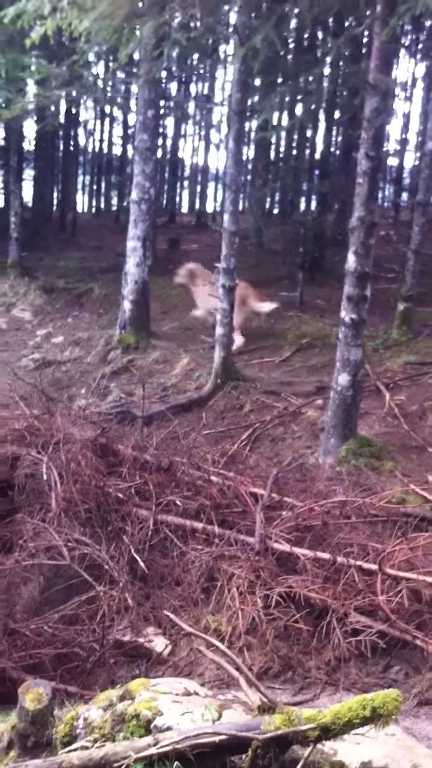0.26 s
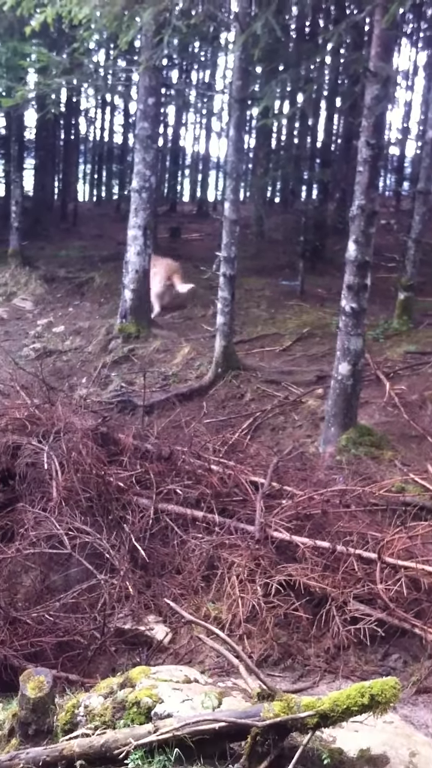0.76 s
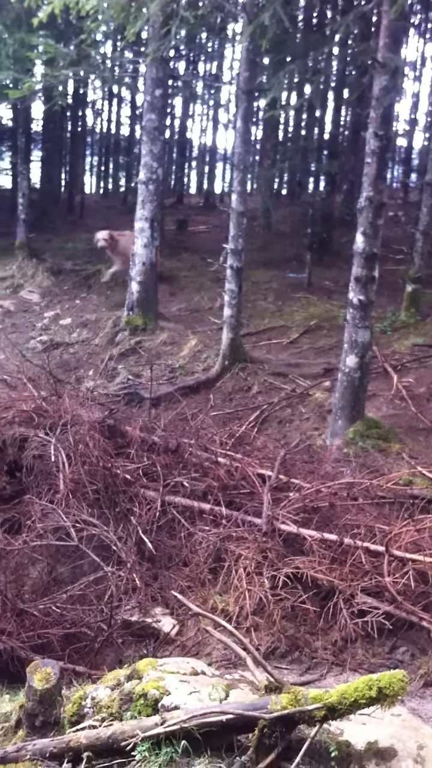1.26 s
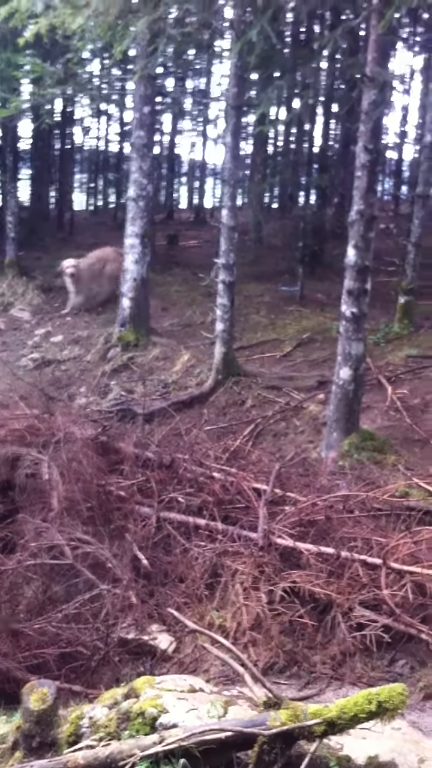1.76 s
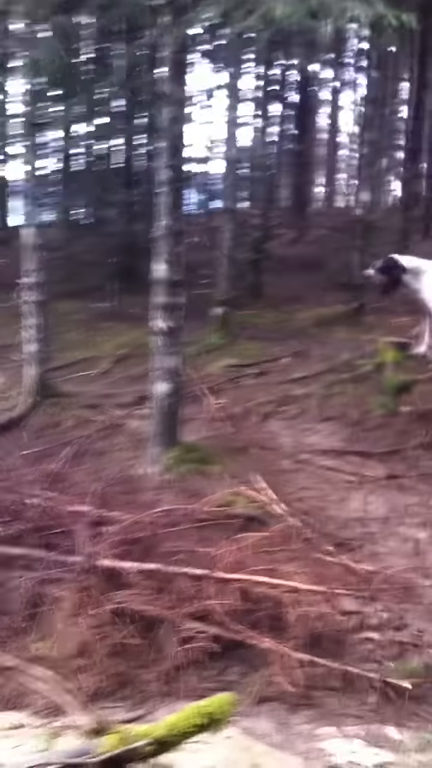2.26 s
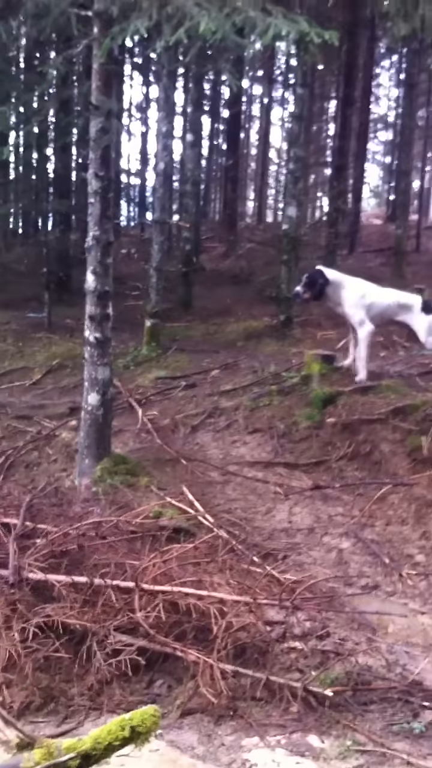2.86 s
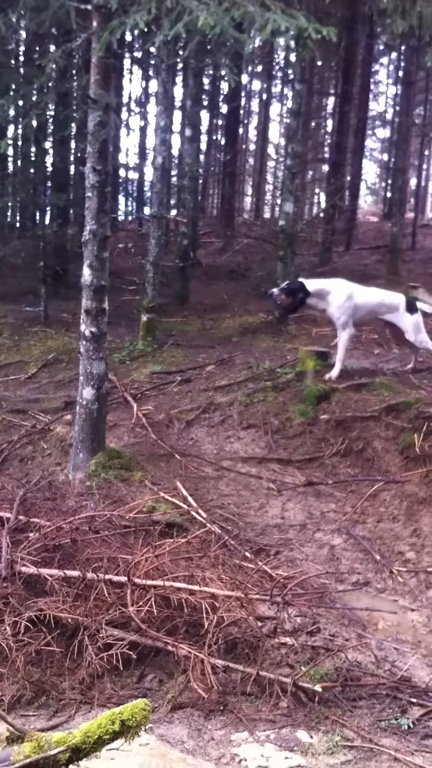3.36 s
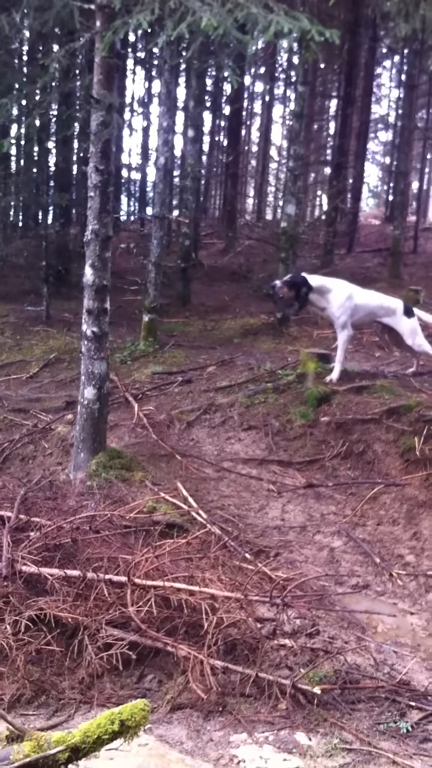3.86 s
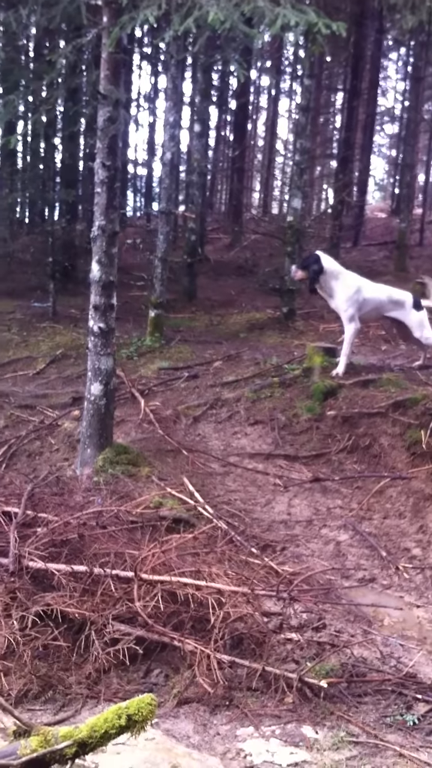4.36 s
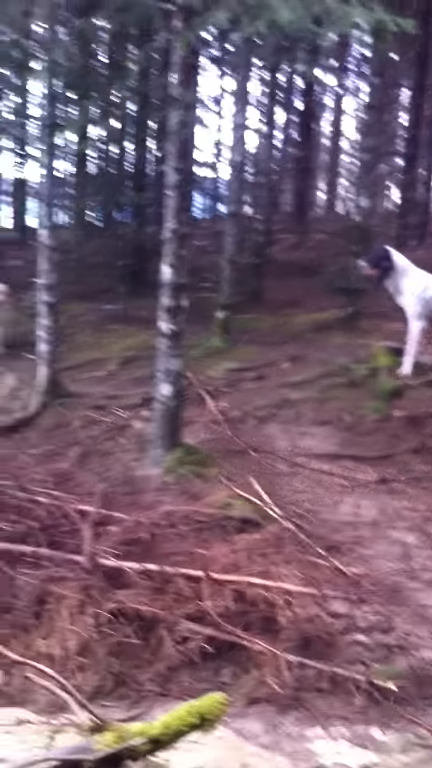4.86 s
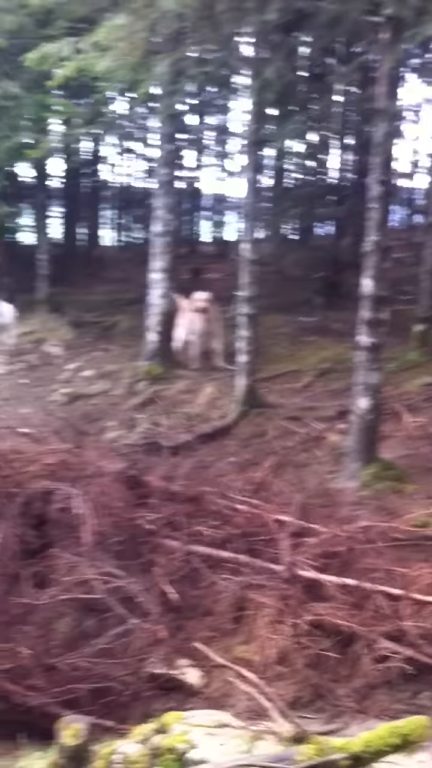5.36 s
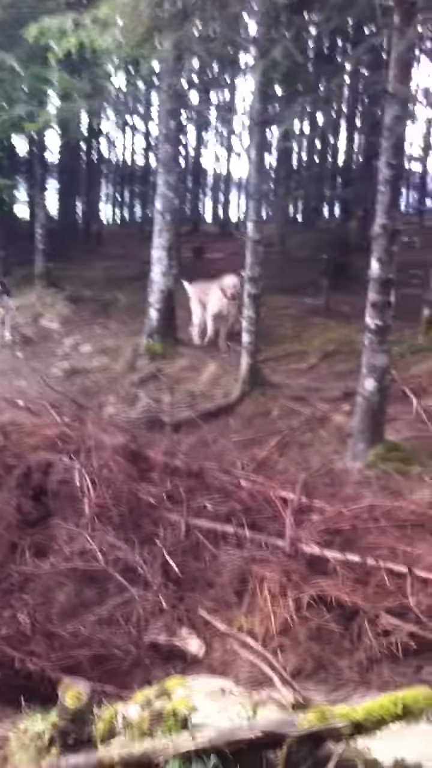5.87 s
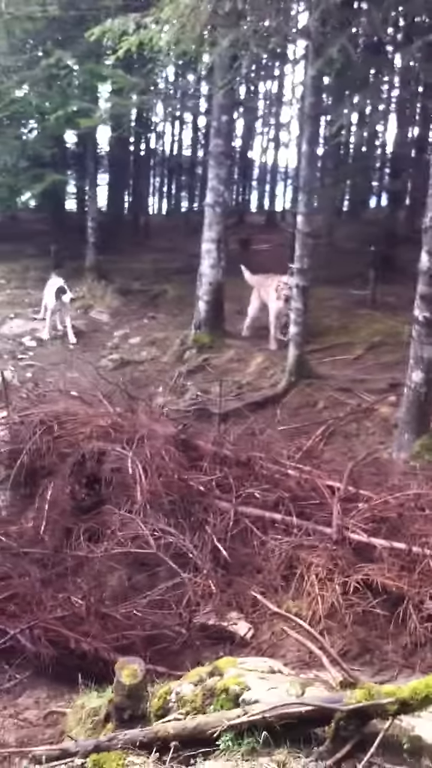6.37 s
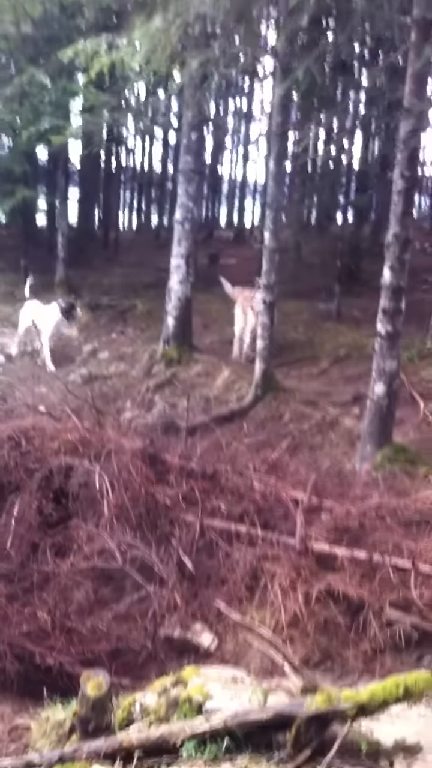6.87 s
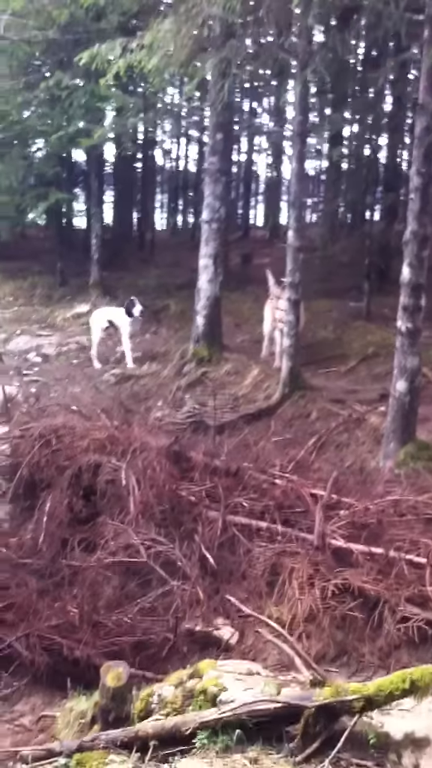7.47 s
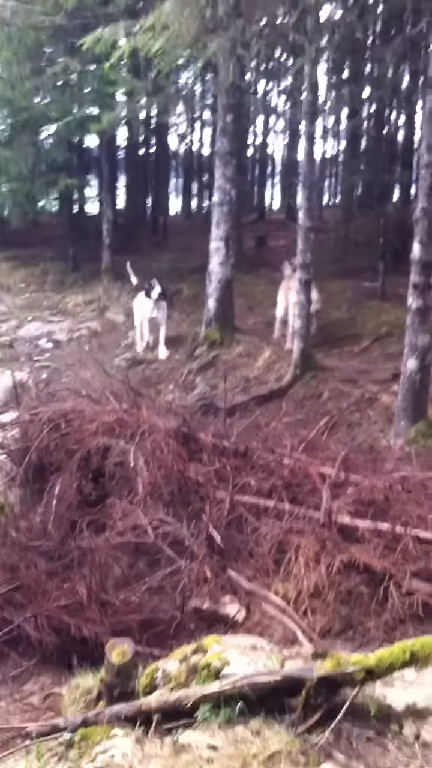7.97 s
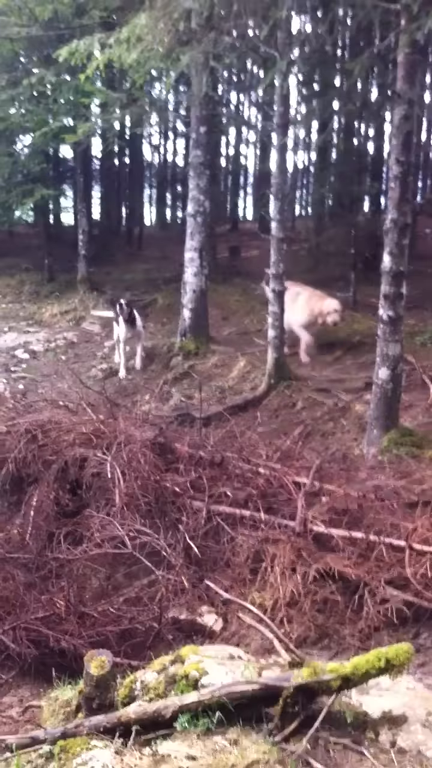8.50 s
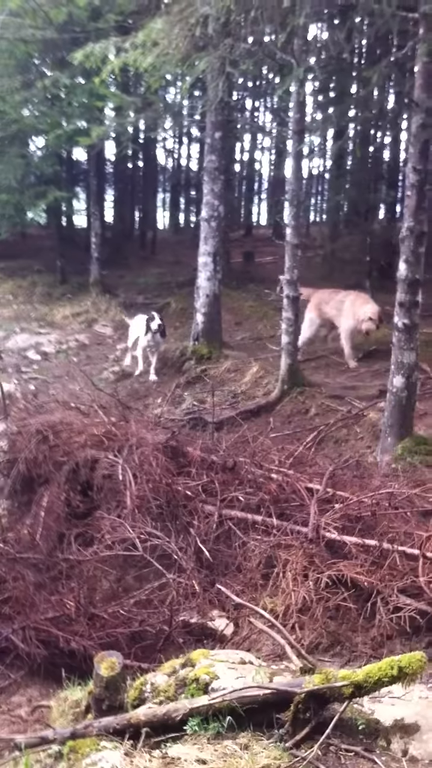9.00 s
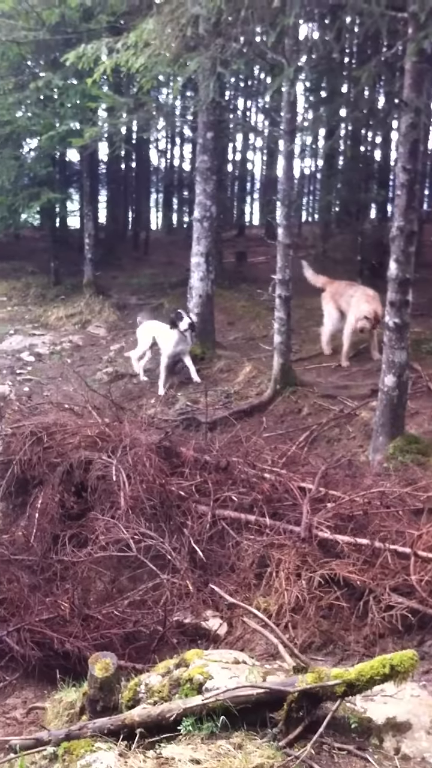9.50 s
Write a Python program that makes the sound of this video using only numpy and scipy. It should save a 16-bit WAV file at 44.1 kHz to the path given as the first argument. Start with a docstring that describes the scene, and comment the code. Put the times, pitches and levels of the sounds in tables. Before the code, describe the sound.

A handheld mono microphone among conifers picks up two hunting dogs baying. The closer one dominates with strong, steady, slightly nasal howls of about a second, each starting with a quick upward scoop and ending in a rough fall. The other, more distant, breaks up from a yelp and slides down. Small birds chirp early, a lull near seven seconds reveals twig snaps and soft footfalls, then both dogs bay again over quiet hiss.

```python
"""Two hounds baying in a spruce forest

A near and a farther hound bay in turn: harmonic partials glide, hold and end in rasp, with noise for breath.
Trunks return thin echoes, made by convolution with sparse decaying pulses. Birds whistle as gliding sines,
twigs tick as brief noise bursts, soft steps thud as short low rings, and the crowns hiss as shaped noise."""
import sys
import numpy as np
from scipy import signal
from scipy.fft import rfft, irfft
from scipy.io import wavfile
from scipy.ndimage import uniform_filter1d, minimum_filter1d, map_coordinates

SR = 44100
rng = np.random.default_rng(int(sys.argv[2]) if len(sys.argv) > 2 else 0)


def store_pcm(level_fs):
    """Save levels as 16-bit WAV."""
    pcm = np.round(np.clip(level_fs, -1, 1) * 32767).astype(np.int16)
    wavfile.write(sys.argv[1], SR, np.atleast_2d(pcm).T)


N = 429534
EDGE_HZ = 15720  # upper limit of the band

# Reverberation of the nearest trunks and ground. Each row: frequency in Hz, time to decay by 60 dB in seconds.
NEAR_WOOD = [(300, 0.26), (700, 0.11), (1400, 0.16), (4000, 0.057)]


def near_hound():
    """The near voice: a harmonic source whose pitch and spectrum follow each bay."""
    # Held part of each bay. Each row: time in seconds, pitch in Hz, then levels in dB of the fundamental,
    # the second partial, partials 3 up as the mouth opens, and the treble (relative).
    bays = [
        [(1.61, 270, -31.5, -30, -28, -45), (1.634, 329, -24, -14.5, -10, -36.5),
         (1.658, 349.6, -7.5, -12.5, -22.5, -40.5), (1.696, 360, -28.5, -7, -30.5, -35),
         (1.734, 366.2, -17, -7.5, -37.5, -38), (1.775, 359, -20, -15, -36.5, -42),
         (1.814, 350.2, -25.5, -11, -32, -43), (1.878, 343.6, -28, -10.5, -31.5, -35.5),
         (2.052, 341.5, -21.5, -12.5, -33.5, -42), (2.222, 334.6, -20, -17.5, -29.5, -44),
         (2.39, 337.3, -21, -18, -33.5, -44.5), (2.456, 340.8, -20.5, -18, -33, -39.5)],
        [(3.197, 280, -33, -22, -23.5, -45), (3.214, 311.3, -25.5, -16, -16, -38),
         (3.242, 339, -15, -20, -19.5, -41.5), (3.264, 337.4, -32.5, -11.5, -35, -37.5),
         (3.304, 347.3, -23, -12.5, -38.5, -42.5), (3.35, 342.6, -27.5, -13.5, -35.5, -45),
         (3.41, 335, -27.5, -12.5, -35.5, -46), (3.52, 327.2, -24.5, -17, -33, -47),
         (3.7, 327.5, -23.5, -15.5, -29, -43), (3.874, 329.4, -20.5, -17.5, -30, -44),
         (4.068, 337.4, -18.5, -13, -30, -43.5), (4.185, 343.4, -16, -15.5, -29, -40)],
        [(5.165, 282, -41.5, -27.5, -31, -53.5), (5.19, 319.4, -27.5, -16.5, -15.5, -47),
         (5.21, 341.3, -16.5, -13.5, -24.5, -40), (5.228, 346.6, -15, -11.5, -22, -41),
         (5.244, 366, -13, -16.5, -28.5, -47.5), (5.316, 364.6, -12.5, -12, -26, -41),
         (5.41, 356.8, -19, -12, -32.5, -46), (5.526, 345, -22.5, -11, -30.5, -38),
         (5.662, 346, -20, -13, -29.5, -38.5), (5.83, 345.2, -18.5, -16, -25.5, -40),
         (5.92, 346.4, -17, -18.5, -22, -39), (6.0, 346, -15.5, -19, -18.5, -35),
         (6.04, 343, -16, -22.5, -26.5, -43)],
        [(7.905, 278.2, -30.5, -40, -29, -47), (7.93, 346.7, -10.5, -16, -23, -36),
         (7.98, 362.2, -17, -15, -32.5, -44), (8.04, 366.5, -18, -15.5, -36, -41.5),
         (8.07, 364.4, -15.5, -10.5, -37, -41.5), (8.25, 346, -19.5, -11, -44.5, -47),
         (8.354, 361.8, -25.5, -5.5, -23.5, -38.5), (8.372, 349, -18.5, -18, -33, -48)],
        [(9.183, 264.2, -43, -22.5, -21, -52.5), (9.2, 327.3, -21.5, -16.5, -18.5, -38.5),
         (9.228, 341, -19, -16, -40.5, -49.5), (9.258, 362, -18.5, -13.5, -31, -44),
         (9.312, 352, -18, -14.5, -39, -45), (9.412, 343.4, -20.5, -10, -33, -47),
         (9.48, 342.2, -18.5, -11, -34, -46), (9.55, 343.3, -17.5, -9.5, -29, -41),
         (9.65, 335, -17.5, -14.5, -31, -50), (9.74, 331.8, -18.5, -14.5, -31, -49)],
    ]
    # Colour of each bay. Each pair: first and last offset in dB, for partials 3, 5, 6 and 7 in turn.
    colours = [
        [(0, -2.5), (-8.5, 1), (-11, 4.5), (5.5, -5.5)],
        [(2, -0.5), (2.5, -1.5), (-14.5, 6.5), (-12, 0.5)],
        [(6.5, -8), (-1.5, -5.5), (0, -7.5), (-2.5, -9)],
        [(5, -4), (-1, -8), (-2.5, -7.5), (-4, 2)],
        [(2, -2), (-5.5, 5.5), (-8, -12), (1.5, -0.5)],
    ]
    # Manner of each bay. Each row: scoop in seconds, drop in seconds, ringing resonance from Hz, to Hz,
    # half-pitch partials relative to the second partial in dB, their fading in dB per second.
    manners = [(.055, .104, 4150, 3950, -23, 60.5), (.04, .085, 4450, 4150, -23, 33),
               (.04, .085, 4200, 4150, -22, 48), (.035, .098, 4250, 4100, -27, 7.5),
               (.035, 0.14, 3950, 4200, -26.5, 49)]
    track = np.zeros(N)
    for held, colour, manner in zip(bays, colours, manners):
        add(track, *near_bay(held, colour, *manner))
    return track


def near_bay(held, colour, scoop_s, drop_s, from_hz, to_hz, *halves):
    """Pitch glide: the voice scoops up out of a rasp, holds, and drops back into it."""
    # Entry and ending against the first or last held row. Each row: share of the glide time,
    # share of the pitch, four level offsets in dB in the order of the held rows.
    scoop = [(-1, .62, -26, -30.5, -39.5, -25), (-.5, .82, -9, -9, -18.5, -10.5)]
    drop = [(.27, .9, -6.5, -17, 2, -12.5), (.55, 0.65, -30, -24.5, -15.5, -13),
            (1, .46, -37.5, -27.5, -22, -12.5)]
    # Spectrum of the upper partials. Each row: frequency in Hz, relative level in dB.
    throat = [(1530, -40), (2600, -7), (3130, -18.5), (3640, -7.5), (4160, 1), (4520, -8.5), (5210, -10),
              (6050, -13), (7450, -13.5), (8210, -21), (9190, -19.5), (11400, -30), (15500, -35)]
    # Mouth resonance on partials 3 up. Each row: frequency in Hz, gain in dB.
    mouth = [(500, -11.5), (760, 6), (960, -9), (1020, -5), (1090, -1), (1220, -3.5), (1370, 1.5),
             (1470, -6), (1690, -9.5), (1810, -26.5), (2030, -9), (2190, -24), (2330, -31.5), (2430, -20),
             (2600, -28.5)]
    rows = shifted(scoop, held[0], scoop_s) + held + shifted(drop, held[-1], drop_s)
    return bay(rows, throat, mouth, colour, (from_hz, to_hz), clear_hz=322, fading_db=9.5, ring_db=7.5,
               strain_span_hz=29.8, order=7, halves=halves)


def far_hound():
    """The far voice: a register break from a yelp or scoop up to a howl that sags."""
    # Each row: time in seconds, pitch in Hz, then levels in dB of the fundamental, the second partial,
    # partials 3 up as the mouth opens, and the treble (relative).
    bays = [
        [(2.31, 620.5, -57.5, -48.5, -58, -55.5), (2.33, 501, -46.5, -34, -48, -51.5),
         (2.35, 428, -39, -24.5, -30, -46), (2.375, 405.2, -43.5, -20.5, -34, -42),
         (2.405, 384.7, -39.5, -16.5, -35, -37.5), (2.418, 448, -29, -29.5, -35.5, -43),
         (2.441, 455.2, -27.5, -32, -23, -48.5), (2.483, 444.8, -25, -33.5, -35.5, -49),
         (2.559, 416, -46, -28.5, -49, -51.5), (2.645, 400.4, -41.5, -28.5, -46.5, -47.5),
         (2.709, 388.5, -31, -31, -48.5, -49), (2.779, 363, -33.5, -28, -49, -51),
         (2.829, 345, -35, -25, -40.5, -49.5), (2.931, 339.8, -28.5, -21.5, -44.5, -49),
         (3.17, 326.5, -36, -24.5, -52, -52.5), (3.45, 325.4, -28, -27, -41.5, -51.5),
         (3.6, 317.5, -49, -25, -46.5, -49), (3.72, 310.7, -37, -28.5, -35.5, -62.5),
         (3.8, 301, -48.5, -32, -38.5, -61), (3.865, 291, -52.5, -53, -45.5, -70)],
        [(4.285, 258.5, -58, -44, -50.5, -63), (4.325, 323.5, -36, -20.5, -26.5, -43),
         (4.355, 353.3, -24.5, -19.5, -36, -47), (4.375, 433, -27.5, -27.5, -41, -45),
         (4.451, 416, -38, -28.5, -41.5, -50), (4.591, 408.3, -41, -26.5, -47, -49.5),
         (4.685, 405, -40.5, -30.5, -49, -48), (4.823, 361.5, -34, -22, -32.5, -54.5),
         (4.885, 334.6, -33.5, -17, -48.5, -41.5), (4.99, 342, -27, -19.5, -44.5, -48),
         (5.04, 325, -37, -28, -39.5, -51.5)],
        [(5.8, 474.5, -62.5, -56, -54, -71.5), (5.825, 420, -50, -44.5, -42, -45),
         (5.872, 378.5, -45.5, -19, -34.5, -35.5), (5.884, 443.4, -33.5, -31.5, -25, -43.5),
         (5.92, 456, -24, -22, -28, -40), (5.98, 428.7, -47, -30, -39.5, -52), (6.1, 419, -46, -29, -33.5, -49),
         (6.215, 409.5, -33.5, -29, -39, -49)],
        [(8.37, 414.5, -38, -25, -51, -40.5), (8.408, 454, -24, -23.5, -32, -45),
         (8.458, 455, -25.5, -31, -35, -45), (8.596, 423.8, -35.5, -30, -40, -50),
         (8.79, 420.3, -34.5, -31.5, -45.5, -50), (8.858, 409.4, -33, -41.5, -40, -47.5),
         (8.96, 370.2, -33, -29.5, -37, -52), (9.026, 356, -31.5, -24.5, -45, -51.5),
         (9.065, 341.3, -35.5, -23.5, -45.5, -45.5), (9.1, 337.6, -33, -32, -41, -45)],
    ]
    # Colour of each bay. Each pair: first and last offset in dB, for partials 3, 5 and 6 in turn.
    colours = [
        [(1.5, -1.96), (-6, -0.5), (0, -1.5)],
        [(1.5, -2), (-5.5, -2), (-5, 2)],
        [(1.5, 3.5), (0.5, -3.5), (0, -2.5)],
        [(-1.5, 5), (0, -4), (-5, 6.5)],
    ]
    # Manner of each bay. Each row: drop in seconds, ringing resonance from Hz, to Hz.
    manners = [(0.045, 4300, 5100), (.065, 4800, 5700), (.095, 5100, 3900), (.06, 4550, 4200)]
    track = np.zeros(N)
    for held, colour, manner in zip(bays, colours, manners):
        add(track, *far_bay(held, colour, *manner))
    return track


def far_bay(held, colour, drop_s, *ring_hz):
    """Pitch glide: the voice sags through the howl and drops off."""
    # Ending against the last held row. Each row: share of the drop time, share of the pitch,
    # four level offsets in dB in the order of the held rows.
    drop = [(.3, 0.94, -4, -2, 1.5, -3.5), (.6, .82, -8, -11, -6.5, -7.5),
            (1, .64, -16.5, -32.5, -23.5, -14.5)]
    # Spectrum of the upper partials. Each row: frequency in Hz, relative level in dB.
    throat = [(1500, -35.5), (2300, -4), (3100, -15), (3700, -5), (4500, -2), (5700, -5.5), (6300, -17),
              (7100, -18.5), (7700, -12), (8500, -25), (11000, -25), (15500, -29.5)]
    # Mouth resonance on partials 3 up. Each row: frequency in Hz, gain in dB.
    mouth = [(600, -8), (800, -3.5), (1000, -2), (1090, 7), (1180, 0), (1300, 1.5), (1450, -8), (1700, -12),
             (1850, -19.5), (2030, -4.5), (2200, -23.5), (2600, -30)]
    rows = held + shifted(drop, held[-1], drop_s)
    return bay(rows, throat, mouth, colour, ring_hz, clear_hz=310, fading_db=7.5, ring_db=4.5,
               strain_span_hz=115, order=6)


def shifted(shape, row, length):
    """Relative trajectory: hangs an entry or ending on a held row."""
    return [(row[0] + at * length, row[1] * share, *np.add(row[2:], db)) for at, share, *db in shape]


def bay(rows, throat, mouth, colour, ring_hz, clear_hz, fading_db, ring_db, strain_span_hz, order, halves=()):
    """Source and filter: steady vocal folds give harmonics, resonances shape them, leaking air adds noise."""
    # Each row: frequency in Hz, relative level of the rasp noise in dB per Hz.
    rasp = [(59, -78.5), (100, -47.5), (161, -33.5), (318, -9.5), (461, -15), (657, -6), (1110, -20.5),
            (1280, -8.5), (1440, -19), (1580, -10), (2520, -36.5), (4000, -46.5), (5200, -76.5),
            (8800, -120)]
    easy_hz = 346  # highest unforced pitch
    rough_span_hz, roughest = 120, 0.46  # below its clear pitch the voice turns to rasp
    hz, first_db, second_db, open_db, upper_db = curves(rows)
    n = len(hz)
    third_db, *higher_db = (open_db + np.linspace(*ends, n) for ends in colour)
    low_db = [first_db, second_db]
    for k, db in enumerate([third_db, open_db, *higher_db], start=3):
        wander_db = (k - 1) * .7 * np.tanh(drift(n, 7.))
        low_db.append(db + read(mouth, k * hz) + wander_db)

    rough = np.clip((clear_hz - hz) / rough_span_hz, 0, roughest)
    glide_per_s = abs(np.gradient(np.log(hz))) * SR
    sliding = np.clip(uniform_filter1d(glide_per_s, 400) / 5., 0, 1)  # fast glides break up
    strain = np.clip((hz - easy_hz) / strain_span_hz, 0, .6)  # a voice pushed above its easy pitch leaks air
    breath = np.clip(.04 + .4 * strain + 1.7 * sliding, 0, 1)  # share of upper partials lost in noise
    jitter = (0.0026 + .03 * sliding) * drift(n, 90.)
    angle = 2 * np.pi * np.cumsum(hz * (1 + jitter)) / SR

    voice = sum(gain_of(db + 4.13 * sliding * drift(n, 120.)) * np.sin((k + 1) * angle + .6 * k)
                for k, db in enumerate(low_db))
    if halves:
        voice += half_pitch(angle, second_db, sliding, *halves)
    voice += upper_partials(angle, hz, upper_db, throat, ring_hz, ring_db, fading_db, strain, breath, order)

    beat = (1 + .4 * np.cos(angle)) * gain_of(1.5 * drift(n, 30.))  # the folds pulse the noise
    rasp_db = np.max(low_db, 0) - 42. + 26.0 * strain + 14.6 * sliding + 56.6 * rough
    out = np.sqrt(2) * voice + gain_of(rasp_db) * beat * coloured(rasp, n)
    out += np.sqrt(breath) * gain_of(upper_db - 3.0) * beat * coloured(throat, n)
    sample = np.arange(n)
    return rows[0][0], out * np.minimum(1, np.minimum(sample, sample[::-1]) / 300)


def half_pitch(angle, second_db, sliding, start_db, fading_db_per_s):
    """Period doubling: every other beat a little weaker adds partials midway between the harmonics."""
    # Each row: multiple of the pitch, relative level in dB.
    partials = [(.5, -16), (1.5, -1.5), (2.5, -5), (3.5, 0.5), (4.5, -5), (5.5, -16.5)]
    hold_s, floor_db = 0.12, -49.5  # the floor is relative to the second partial
    n = len(angle)
    fade_db = fading_db_per_s * np.maximum(np.arange(n) / SR - hold_s, 0)
    level_db = second_db + np.maximum(start_db - fade_db, floor_db)
    patchy = sum(gain_of(db + 4.5 * drift(n, 22.)) * np.sin(k * angle) for k, db in partials)
    return (1 - sliding) ** 2 * gain_of(level_db) * patchy


def upper_partials(angle, hz, upper_db, throat, ring_hz, ring_db, fading_db, strain, breath, order):
    """Resonance and multipath: throat and two rings shape the treble, whose partials fade one by one."""
    second_ring, second_ring_share = 1.49, .8  # times the first ring in frequency, share of its dB
    step = 64  # samples between the points where levels are set
    n = len(hz)
    ranks = np.arange(order + 1, 44)
    upper_hz = ranks[:, None] * hz[::step]
    ring = np.linspace(*ring_hz, upper_hz.shape[1])
    shape_db = read(throat, upper_hz) + ring_db * np.exp(-((upper_hz - ring) / 150.0) ** 2)
    shape_db += second_ring_share * ring_db * np.exp(-((upper_hz - second_ring * ring) / 150.0) ** 2)
    # Even out the summed power above 2700 Hz, so that the treble level alone governs it.
    shape_db -= 10 * np.log10((gain_of(2 * shape_db) * (upper_hz > 2700)).sum(0))
    out = np.zeros(n)
    for k, db in zip(ranks, shape_db):
        # Paths between the trunks make each upper partial fade by itself.
        db = db + fading_db * np.tanh(drift(len(db), step * 6.))
        db += 9 * strain[::step] * drift(len(db), step * 35)
        db = np.interp(np.arange(n), np.arange(0, n, step), db) + upper_db - 6.0
        tone = np.sin(k * angle + 2 * np.pi * rng.random()) * (k * hz < EDGE_HZ)
        out += np.sqrt(1 - breath) * gain_of(db) * tone
    return out


def small_birds():
    """Frequency modulation: a low and a high group of whistles, each with its own warble."""
    # Each row, in both: start in seconds, length in seconds, from Hz, to Hz, level in dB.
    low = [(0.028, .2, 2630, 2600, -65.5), (0.543, .18, 3010, 2790, -62.5), (0.75, .3, 2810, 2560, -61),
           (1.18, .04, 3300, 3700, -64), (1.22, .06, 3140, 3030, -53.5), (1.279, .07, 2950, 2500, -55.5),
           (1.495, .08, 2760, 2660, -70), (2.568, .055, 2650, 3370, -61.5), (2.686, 0.15, 3550, 2656, -61),
           (3.105, .065, 2495, 4100, -62), (3.66, .03, 2520, 3480, -66), (3.749, .1, 3700, 2700, -61),
           (6.171, 0.15, 3476, 2834, -61.5)]
    high = [(.7, 0.21, 7300, 7350, -71.5), (.85, 0.21, 8000, 7650, -69), (6.93, 0.14, 9100, 8630, -75),
            (7.1, 0.12, 8570, 7780, -72.5), (7.68, 0.061, 7850, 8270, -78), (7.785, .055, 8200, 8220, -76)]
    track = np.zeros(N)
    for row in low:
        add(track, *whistle(*row, warble=.004, per_s=26.0))
    for row in high:
        add(track, *whistle(*row, warble=0.011, per_s=32.))
    return track


def whistle(start, length, from_hz, to_hz, db, warble, per_s):
    """A near-pure tone: one gliding sine with a quick warble and a flickering level."""
    t = np.arange(0, length, 1 / SR)
    settle = 1.3 if to_hz < from_hz else 1  # a falling whistle glides fastest at its start
    hz = to_hz + (from_hz - to_hz) * (1 - t / length) ** settle
    angle = 2 * np.pi * np.cumsum(hz * (1 + warble * np.sin(2 * np.pi * per_s * t))) / SR
    level = np.sqrt(2) * gain_of(db + 3 * drift(len(t), 50))
    return start, level * np.sin(angle) * signal.windows.tukey(len(t), .5)


def small_knocks():
    """Impulsive sources: twig ticks and soft steps at their times."""
    # Each row: start in seconds, relative level in dB, centre in Hz, width in octaves.
    ticks = [(0.046, -39, 2660, 2.2), (0.256, -45, 3500, 1.3), (0.596, -45, 2880, 2.0),
             (1.082, -48, 4080, 1.1), (6.648, -47, 4370, 2.6), (6.7892, -52, 4350, 2.0),
             (7.4787, -56, 6500, 2.0), (7.4786, -35, 3600, 2), (7.661, -39.5, 5400, 1.4),
             (7.731, -47, 2510, 1.8)]
    # Soft steps. Each row: start in seconds, level in dB at the head of the decay, frequency in Hz.
    thuds = [(0.121, -46, 160), (7.127, -45, 207), (7.499, -40, 221), (7.519, -40, 250)]
    track = np.zeros(N)
    for s, *snap in ticks:
        add(track, s, tick(*snap))
    for s, *step in thuds:
        add(track, s, thud(*step))
    return track


def tick(db, hz, octaves):
    """Band noise with fast decay: a dry twig snap of a few milliseconds round one pitch."""
    t = np.arange(512) / SR
    band = [(hz / 2 ** octaves, -20), (hz, 0), (hz * 2 ** octaves, -12)]
    return gain_of(db - 4 - 60 * t / .011) * coloured(band, len(t))  # 60 dB down in 11 ms


def thud(db, hz):
    """Damped oscillation: a soft step on the needles is a short low ring."""
    t = np.arange(3000) / SR
    return gain_of(db - 60 * t / 0.032) * np.sin(2 * np.pi * hz * t) * np.minimum(1, t * hz)


def forest_echo(near, far, birds):
    """Scattering: a long tail from the wood, a short one from near trunks, and a late thin answer."""
    # Reverberation of the wood. Each row: frequency in Hz, time to decay by 60 dB in seconds.
    wood = [(300, .6), (800, 1.1), (1500, 1.1), (2800, 1.0), (4500, 2.2), (7000, 1.6), (10000, .6)]
    late_s, late_near_db, late_far_db = 0.15, -42, -32  # the edge of the stand answers late
    echo = trunks(gain_of(-29) * near + gain_of(-21) * far + gain_of(-11) * birds, wood)
    echo += trunks(gain_of(-17) * near + gain_of(-15) * far, NEAR_WOOD)
    thinning = signal.butter(2, 600., "high", fs=SR, output="sos")
    thin = signal.sosfilt(thinning, gain_of(late_near_db) * near + gain_of(late_far_db) * far)
    add(echo, late_s, trunks(thin, NEAR_WOOD))
    return echo


def trunks(x, decays):
    """Convolution with sparse echoes of random sign, each band dying at its own speed."""
    taps = np.zeros(SR + SR // 2)
    at = np.arange(300, len(taps) - 20, 20)  # one echo at random in every 20 samples
    taps[at + rng.integers(0, 20, len(at))] = rng.choice([-1., 1.], len(at))
    hz, t, z = signal.stft(taps, SR, nperseg=256)
    decay = gain_of(-60 * t / read(decays, hz)[:, None])
    tail = signal.istft(z * decay, SR, nperseg=256)[1]
    return signal.fftconvolve(x, tail / np.linalg.norm(tail))[:N]


def hiss():
    """Broadband noise: air in the crowns, with small patches drifting in time and frequency."""
    # Each row: frequency in Hz, relative level in dB per Hz.
    spectrum = [(18, -58), (30, -40), (160, -4), (213, -10.5), (341, -8.5), (410, -14.5), (673, -8),
                (747, -5.5), (1640, -11), (3230, -20.5), (3780, -19), (6370, -21), (8720, -24),
                (15500, -31.5)]
    # Each row: time in seconds, level in dB.
    levels = [(0, -57.5), (.9, -58), (1.501, -60.5), (6.501, -59), (7.001, -62.5), (7.8, -63), (9.74, -55)]
    frames, hz = N // 256 + 5, np.fft.rfftfreq(1024, 1 / SR)
    real, imaginary, patches = rng.standard_normal((frames, 513, 3)).T
    patches = uniform_filter1d(patches, 12, 0)  # across frequency
    patches = evened(uniform_filter1d(patches, 14, 1))  # along time
    z = (real + 1j * imaginary) * gain_of(read(spectrum, hz)[:, None] + 1.2 * patches)
    noise = signal.istft(z, nperseg=1024, noverlap=768)[1][:N]
    level_db = np.interp(np.arange(N) / SR, *np.transpose(levels))
    level_db += .6 * drift(N, 4.)
    return gain_of(level_db) * evened(noise)


def gain_of(db):
    """Level to amplitude: turns decibels into a factor."""
    return 10 ** (np.asarray(db) / 20)


def evened(x):
    """Normalisation of power: scales to rms 1."""
    return x / np.sqrt(np.mean(x ** 2) + 1e-20)


def read(points, hz):
    """Interpolation on a log-frequency axis: reads a tabulated curve."""
    f, value = np.transpose(points)
    return np.interp(np.log(hz + 1), np.log(f + 1), value)


def add(mix, s, sound):
    """Superposition: mixes a sound in at a time in seconds."""
    part = mix[round(s * SR):][:len(sound)]
    part += sound[:len(part)]


def curves(rows):
    """Linear interpolation: joins table rows by straight lines, one value a sample."""
    s, *columns = np.transpose(rows)
    t = np.arange(s[0], s[-1], 1 / SR)
    return [np.interp(t, s, c) for c in columns]


def drift(length, per_s):
    """Slow fluctuation: a cubic curve through per_s random values a second, of about unit deviation."""
    steps = np.arange(length) / SR * per_s
    values = rng.standard_normal(int(N / SR * 20) + int(steps[-1]))
    return map_coordinates(values, [steps], order=3)


def coloured(points, length):
    """Spectral shaping: white noise filtered to a given spectrum, at rms 1."""
    hz = np.fft.rfftfreq(length, 1 / SR)
    return evened(irfft(rfft(rng.standard_normal(length)) * gain_of(read(points, hz)), length))


def scene():
    """Superposition of hounds, birds, small knocks, echoes and hiss."""
    near, far = near_hound(), far_hound()
    birds = small_birds()
    echo = forest_echo(near, far, birds)
    return (near + far + birds + small_knocks() + echo + hiss())[None]


def record(dry):
    """Transduction: bass roll-off, a slightly lopsided capsule, a quick limiter on loud peaks, a band limit."""
    dry = signal.sosfilt(signal.butter(2, 110., "high", fs=SR, output="sos"), dry)
    dry = dry - .025 * dry ** 2  # lopsided capsule
    room_left = minimum_filter1d(np.minimum(1, .7 / (abs(dry) + 1e-9)), size=441)
    limited = dry * uniform_filter1d(room_left, size=441)
    loud = signal.sosfilt(signal.butter(1, 30., "high", fs=SR, output="sos"), limited)
    band_limit = signal.firwin(511, EDGE_HZ, window=("kaiser", 9), fs=SR)
    return signal.oaconvolve(loud, band_limit[None], "same")


dry = scene()
out = record(dry)
store_pcm(out)
```